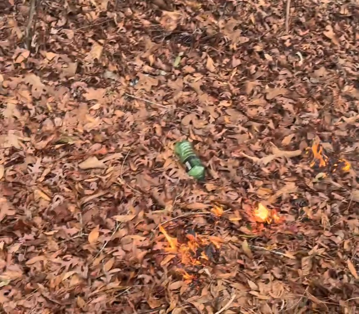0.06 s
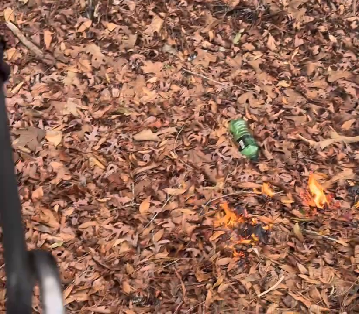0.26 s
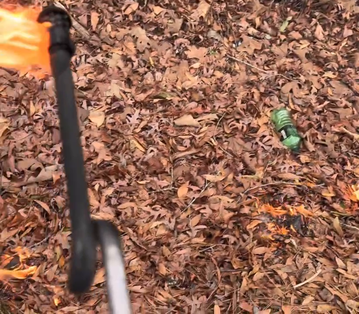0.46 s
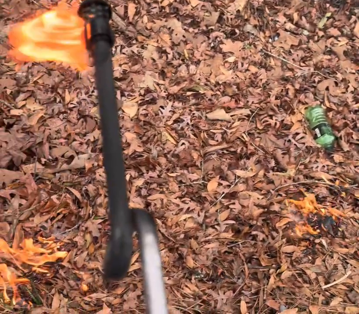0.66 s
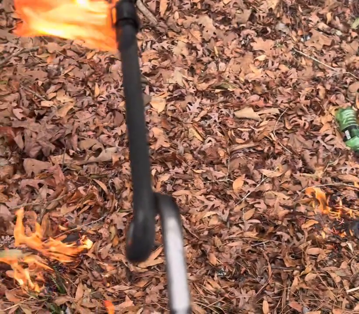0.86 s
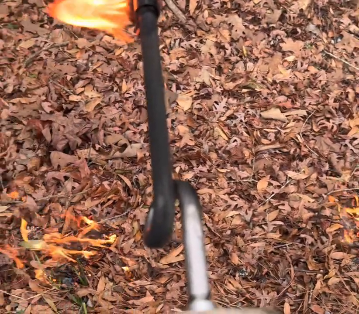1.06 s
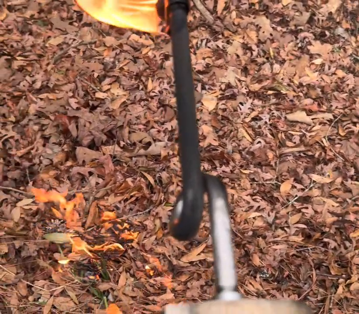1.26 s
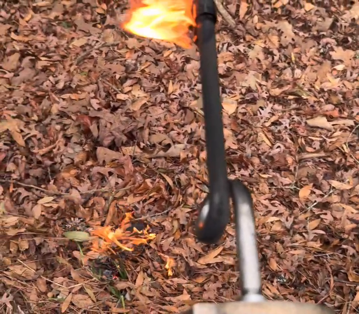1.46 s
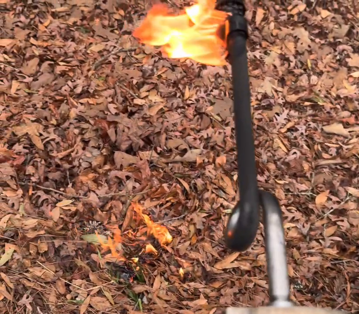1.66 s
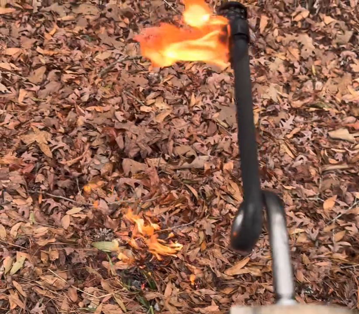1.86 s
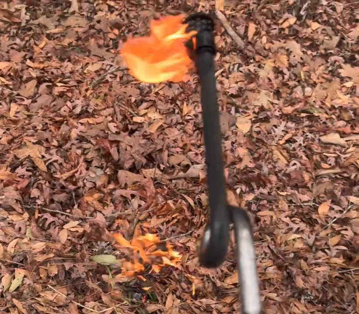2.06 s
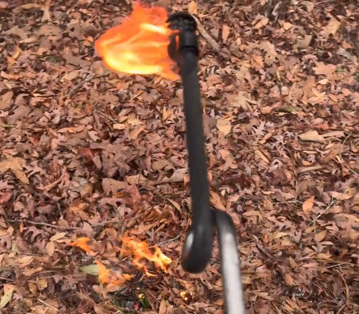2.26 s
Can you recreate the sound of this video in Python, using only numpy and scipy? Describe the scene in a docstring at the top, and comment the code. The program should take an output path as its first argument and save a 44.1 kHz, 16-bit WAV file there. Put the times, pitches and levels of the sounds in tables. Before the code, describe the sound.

Small fires crackle through dry leaves, over the soft flapping of a close torch flame.

```python
"""On a forest floor, small fires creep through dry leaves. Brittle fracture gives sharp snaps and a fine
crackle; the burning edge sizzles and steam escapes in short spits. A torch flame close to the microphone
flutters in the breeze with a low, turbulent rumble, flapping now and then. The leaf litter scatters each
snap briefly and stirs with a soft rustle and a few scuffs; the woods add a faint tail and a steady hush."""
import sys
import numpy as np
from scipy import signal
from scipy.fft import rfft, irfft, next_fast_len
from scipy.io import wavfile
from scipy.ndimage import map_coordinates

SR = 44100
rng = np.random.default_rng(int(sys.argv[2]) if len(sys.argv) > 2 else 0)


def to_wav(s):
    """Save 16-bit WAV."""
    ch = np.atleast_2d(s).T  # columns
    pcm = np.round(np.clip(ch, -1, 1) * 32767)  # PCM
    wavfile.write(sys.argv[1], SR, pcm.astype(np.int16))


N = 105840

# Spectra of the noise sources. Each row: frequency in Hz, relative level in dB.
HUSH_SPECTRUM = [(20, 3.5), (60, 10.5), (130, 8.5), (300, 8), (500, -0.5), (750, -21), (1100, -33),
                 (2000, -37), (5000, -37), (16000, -25)]
RUSTLE_SPECTRUM = [(200, 8), (500, 7.5), (900, 2), (1400, -9), (2200, -8.5), (5000, -6.5), (16000, -99)]
SCUFF_SPECTRUM = [(150, -15), (500, 9), (850, 0.5), (1250, 2.5), (1700, -13), (4000, -21), (16000, -45)]
RUMBLE_SPECTRUM = [(20, -18), (30, -21), (42, 2), (76, -3), (105, 5), (135, 0), (200, -13), (400, -48),
                   (800, -70)]
ROAR_SPECTRUM = [(70, -1.5), (130, 4), (180, 7), (250, -1), (340, 5), (460, -30), (600, -36), (1000, -45),
                 (3000, -70)]
SIZZLE_SPECTRUM = [(300, -65), (1200, -4.5), (2400, -5), (3700, -5.5), (4600, -12.5), (5700, -2),
                   (8300, 1.5), (10400, -6), (12400, -14), (15400, 10.5), (16300, -35)]
TAIL_SPECTRUM = [(300, 20), (1500, -3), (4000, 8.5), (7000, 7.5), (10500, 3.5), (15000, -36)]
# Colour of the burning leaves, and of the fine crackle alone. Each row: frequency in Hz, gain in dB.
LEAF_COLOUR = [(400, -14), (1400, -0.5), (2200, -2.5), (3000, -4), (3800, 2), (4600, -1.5), (5600, 4),
               (7000, 0.5), (8600, 4), (10000, -1.5), (11200, 1), (12400, 5.5), (15300, 7), (16400, -8)]
CRACKLE_COLOUR = [(200, -25), (1200, -5), (4000, -2), (8000, -1), (15000, 1)]
# Slow envelopes of rustle, sizzle and the torch between puffs. Each row: time in seconds, level in dB.
RUSTLE_LEVEL = [(0, -61.5), (.2, -69.5), (1.4, -65), (1.68, -61.5), (1.82, -61), (1.92, -63.5),
                (2.0, -60.5), (2.07, -68.5), (2.4, -61)]
SIZZLE_LEVEL = [(0, -57), (.2, -65.5), (.45, -60.5), (.6, -61), (.78, -63), (1.15, -63), (1.5, -65),
                (1.8, -60.5), (2.05, -61.5), (2.25, -60.5), (2.4, -60)]
TORCH_LEVEL = [(0, -66.5), (.18, -54), (.3, -45), (.75, -53), (1.7, -49.5), (1.83, -55), (2.05, -66.5),
               (2.4, -62.5)]
# Scuffs in the litter. Each row: centre in seconds, level in dB, left minus right in dB.
SCUFFS = [(1.677, -60, -5), (1.764, -60, -5), (1.968, -60, -2)]
# Throb of the torch flame. Each row: time in seconds, central rate in Hz.
FLUTTER_RATE = [(0.199, 62.46), (.3, 79.92), (.7, 70.05), (1.1, 84.82), (1.802, 60.2)]
# Puffs of the flame. Each row: centre in seconds, relative level in dB.
PUFFS = [(0.053, -52), (0.229, -38), (0.263, -34), (0.288, -43), (0.324, -58), (0.391, -24), (0.425, -28),
         (0.472, -28.5), (0.504, -25), (0.549, -39.5), (0.578, -36), (0.606, -32), (0.648, -41.5),
         (0.719, -47), (0.755, -51.5), (0.854, -37), (0.885, -36.5), (0.934, -43), (0.995, -32.5),
         (1.053, -42.5), (1.103, -40), (1.164, -39), (1.211, -40.5), (1.288, -50), (1.379, -44),
         (1.427, -40), (1.463, -42.5), (1.512, -42), (1.55, -49), (1.597, -35.5), (1.67, -41),
         (1.728, -37.5), (1.778, -43), (1.87, -69), (2.142, -48)]
# Flaps of the flame. Each row: start in seconds, level at full swell in dB.
FLAPS = [(0.373, -46), (0.491, -38.5), (0.786, -46.5), (0.835, -43), (0.873, -44), (0.936, -45),
         (0.948, -41), (0.972, -41.5), (0.991, -39), (1.012, -41.5), (1.146, -41.5), (1.215, -42.5),
         (1.37, -44.5), (1.392, -40.5), (1.407, -42), (1.418, -42), (1.588, -36), (1.658, -45.5),
         (1.957, -51)]
# Spits of steam. Each row: start in seconds, level before colouring in dB, decay time in seconds.
SPITS = [(0.174, -52, 0.043), (.486, -46, 0.012), (.616, -46.5, 0.011), (1.056, -48.5, 0.016)]
# Leaf snaps. Each row: start in seconds, low, middle and top band levels before colouring in dB,
# ring frequency in Hz.
SNAPS = [(0.035, -46, -52, -51, 1780), (0.0768, -59, -51.5, -47, 7500), (0.0972, -49.5, -49, -52, 5800),
         (0.1729, -61, -44, -38.5, 7200), (0.1793, -75, -59, -39.5, 8100), (0.2312, -73, -57, -47, 8400),
         (0.2362, -62, -50.5, -44.5, 7760), (0.2474, -82, -53.5, -49, 7600),
         (0.3575, -71, -49.5, -38, 7500), (0.3884, -57, -50.5, -42.5, 2870),
         (0.4145, -56, -48.5, -42, 7800), (0.4378, -57, -49, -46, 6400), (0.4572, -58, -51, -48, 3000),
         (0.4818, -51, -46, -33, 3630), (0.483, -43.5, -34, -36, 7000), (0.5237, -40, -36, -37, 3270),
         (0.5252, -63, -46, -37, 7300), (0.5366, -66, -50, -54, 6240), (0.545, -70, -62, -49, 8340),
         (0.612, -54, -47.5, -43.5, 7600), (0.619, -55, -47.5, -43, 7200), (0.6203, -54, -46.5, -48, 6070),
         (0.6354, -61, -44.5, -38, 7300), (0.644, -74, -62, -48, 8600), (0.815, -48, -42, -45, 5570),
         (0.8234, -59, -46.5, -45, 5500), (0.9, -68, -66, -49, 9320), (0.9643, -73, -52, -50.5, 6900),
         (1.0378, -82, -43.5, -35.5, 6340), (1.053, -37.5, -35, -42, 7263), (1.0554, -39, -28, -31, 8200),
         (1.1114, -69, -44, -45, 8500), (1.1774, -58.5, -47, -40, 6400), (1.268, -82, -41.5, -36, 6600),
         (1.3183, -36.5, -32.5, -31.5, 3500), (1.4546, -65, -46, -47, 7800),
         (1.6033, -58, -48, -49.5, 8237), (1.6254, -45.5, -46, -45.5, 7794), (1.6612, -66, -54, -47, 7880),
         (1.6658, -61, -48.5, -45, 6500), (1.7413, -47.5, -39, -39, 5780), (1.788, -60.0, -48.5, -44, 9000),
         (1.792, -50, -51, -45.5, 8900), (1.8367, -53.5, -59, -65, 1260), (1.858, -52.5, -45, -51, 7020),
         (1.887, -53, -34, -32.5, 9800), (1.932, -54, -44.5, -42, 6400), (2.0997, -52.5, -42.5, -47, 3450),
         (2.1574, -75, -60, -45, 7900), (2.2103, -36.5, -40, -36, 3990), (2.235, -49.5, -45.5, -33.5, 6550),
         (2.2605, -55, -41.5, -38, 7900), (2.278, -51, -47, -35.5, 9300), (2.287, -51.5, -43, -41, 6700),
         (2.3432, -55, -51, -43.5, 7760), (2.395, -58.0, -44.5, -51, 5700)]
# The low, middle and top bands of a snap. Each row: lower edge in Hz, upper edge in Hz.
SNAP_BANDS = [(400, 2500), (2500, 9500), (9500, 16800)]
# Phase between the two microphone ports. Each row: frequency in Hz, lead of the left in radians.
PORT_PHASE = [(0, 0), (1900, 0), (3000, -.6), (4100, -.7), (4850, -1.9), (5600, -.3), (6400, -.3),
              (9000, -1.6), (10500, -2.7), (13000, -3.2), (15600, -4.5)]

LOW_CUT_HZ, TOP_HZ = 14.3, 16500  # limits of the microphone's passband
TIME = np.arange(N) / SR


def amp(db):
    """Amplitude ratio of a level in decibels."""
    return 10 ** (np.asarray(db) / 20)


def unit(x):
    """Normalisation to an rms of 1."""
    return x / np.sqrt(np.mean(x ** 2) + 1e-20)


def sized(x, db):
    """Energy normalisation: x carries the energy of one millisecond at this level."""
    return amp(db) * x * np.sqrt(SR / 1000 / np.sum(x ** 2))


def add(track, start, x):
    """Superposition of x on the track from a start in seconds."""
    i = max(round(start * SR), 0)
    span = track[i:i + len(x)]
    span += x[:len(span)]


def envelope(rows):
    """A gain per sample, interpolated in decibels."""
    return amp(np.interp(TIME, *np.transpose(rows)))


def swells(rows, half_width_s):
    """Incoherent addition: bell-shaped swells sum in power."""
    return np.sqrt(sum(amp(db) ** 2 * np.exp(-((TIME - s) / half_width_s) ** 2) for s, db in rows))


def wobble(knots_per_s, order=3):
    """Random modulation: a spline through Gaussian values."""
    return map_coordinates(rng.standard_normal(N), [TIME * knots_per_s], order=order)


def filtered(x, response):
    """Linear filtering: the spectrum of x is multiplied by a complex frequency response."""
    size = next_fast_len(N + 8192)
    hz = np.fft.rfftfreq(size, 1 / SR)
    return irfft(rfft(x, size) * response(hz), size)[..., :N]


def coloured(x, points):
    """Spectral shaping by gains in dB, interpolated on a logarithmic frequency axis."""
    point_hz, db = np.transpose(points)
    return filtered(x, lambda hz: amp(np.interp(np.log(hz + 1), np.log(point_hz + 1), db)))


def ports(x):
    """One wave reaches the two microphone ports with a phase difference that depends on frequency."""
    sides = np.array([[1], [-1]])
    return filtered(x, lambda hz: np.exp(.5j * np.interp(hz, *np.transpose(PORT_PHASE)) * sides))


def rush(spectrum, diffuse_db):
    """Partly coherent stereo noise of rms 1: a direct wave plus a diffuse part unlike at each port."""
    direct = ports(rng.standard_normal(N))
    diffuse = amp(diffuse_db) * rng.standard_normal((2, N))
    return unit(coloured(direct + diffuse, spectrum))


def woods():
    """Ambient noise: a steady hush and the diffuse rustle of the leaf litter."""
    hush = amp(-60.5) * rush(HUSH_SPECTRUM, diffuse_db=-.5)
    rustle = envelope(RUSTLE_LEVEL) * rush(RUSTLE_SPECTRUM, diffuse_db=15)
    return hush + rustle


def scuffs():
    """Shifting leaves give dull swishes, placed to the right by a level difference."""
    out = np.zeros((2, N))
    for centre, db, pan_db in SCUFFS:
        swell = swells([(centre, db)], half_width_s=.0083)
        balance = amp([[pan_db / 2], [-pan_db / 2]])
        out += swell * balance * rush(SCUFF_SPECTRUM, diffuse_db=-20)
    return out


def flaps(start_hz=592.6, end_hz=73.5, rise_s=.0091, glide_s=.0055):
    """The flame tears and closes again: a quick downward chirp with a little turbulent roar."""
    t = np.arange(SR // 20) / SR
    hz = end_hz + (start_hz - end_hz) * np.exp(-t / glide_s)
    phase = 2 * np.pi * np.cumsum(hz) / SR
    shape = (t / rise_s * np.exp(1 - t / rise_s)) ** 2
    chirps, swell = np.zeros(N), np.zeros(N)
    for start, db in FLAPS:
        chirp = np.sqrt(2) * np.sin(phase + rng.uniform(0, 2 * np.pi))
        add(chirps, start, amp(db) * shape * chirp)
        add(swell, start, amp(db) * shape)
    roar = amp(-10.5) * swell * rush(ROAR_SPECTRUM, diffuse_db=2)
    return chirps + roar


def torch():
    """A flame oscillates at a wandering rate amid turbulence; puffs modulate both, and flaps add on top."""
    puffs = amp(-1.5) * swells(PUFFS, half_width_s=.013)
    strength = np.hypot(puffs, envelope(TORCH_LEVEL))
    wander = np.exp(.17 * wobble(knots_per_s=80))
    hz = np.interp(TIME, *np.transpose(FLUTTER_RATE)) * wander
    throb = unit(np.sin(2 * np.pi * np.cumsum(hz) / SR))
    turbulence = amp(-6) * rush(RUMBLE_SPECTRUM, diffuse_db=-9.5)
    return strength * (throb + turbulence) + flaps()


def woods_tail(x, gain_db=-17, decay_s=.016):
    """Reverberation: scattered sound follows the power of x and dies away exponentially."""
    retained = np.exp(-2 / (decay_s * SR))
    power = signal.lfilter([1 - retained], [1, -retained], x ** 2)
    return amp(gain_db) * np.sqrt(power) * rush(TAIL_SPECTRUM, diffuse_db=-1.5)


def sizzle(grain_db=5):
    """The burning edge hisses; random amplitude modulation gives the noise its fine, uneven grain."""
    grain = amp(grain_db * wobble(knots_per_s=450, order=1))
    return envelope(SIZZLE_LEVEL) * unit(grain * rush(SIZZLE_SPECTRUM, diffuse_db=-7))


def spits():
    """Escaping steam radiates a short hiss that decays exponentially."""
    out, t = np.zeros(N), np.arange(SR // 10) / SR
    for start, db, decay_s in SPITS:
        add(out, start, amp(db) * rng.standard_normal(len(t)) * np.exp(-t / decay_s))
    return coloured(out, [(500, 13.5), (3000, -43), (6500, 2), (15000, -1)])


def fracture(t, ring_hz, rise_s=.00009, ring_s=.00026, litter_s=.0012):
    """Impulse excitation: a crack sets the leaf into damped vibration, and the litter scatters it."""
    crack = rng.standard_normal(len(t)) * t * np.exp(-t / rise_s)
    ring = np.sin(2 * np.pi * ring_hz * t) * np.exp(-t / ring_s) * (1 - np.exp(-t / rise_s))
    litter = rng.standard_normal(len(t)) * np.exp(-t / litter_s)
    return unit(unit(crack) + amp(-7) * unit(ring) + amp(-9) * unit(litter))


def crackle(count=800, ticks_per_s=220):
    """A Poisson process of tiny fractures, most of them faint."""
    out, t = np.zeros(N), np.arange(96) / SR
    starts = np.cumsum(rng.exponential(size=count)) / ticks_per_s
    levels_db = np.minimum(-68 + 3.8 * rng.exponential(size=count), -54)
    rings_hz = np.minimum(6500 * np.exp(.5 * rng.standard_normal(count)), TOP_HZ)
    for start, db, ring_hz in zip(starts, levels_db, rings_hz):
        add(out, start, sized(fracture(t, ring_hz), db))
    return coloured(out, CRACKLE_COLOUR)


def snaps(knock_hz=740, knock_db=-5.5):
    """Brittle fracture: each leaf spreads its energy over three bands, with a dull, damped knock."""
    out, t = np.zeros(N), np.arange(256) / SR
    bands = [signal.butter(3, edges, 'bandpass', fs=SR, output='sos') for edges in SNAP_BANDS]
    knock = np.sin(2 * np.pi * knock_hz * t) * np.exp(-2 * knock_hz * t)
    for start, *levels_db, ring_hz in SNAPS:
        add(out, start, sized(knock, levels_db[0] + knock_db))  # relative to the low band
        burst = fracture(t, ring_hz)
        for band, db in zip(bands, levels_db):
            add(out, start, sized(signal.sosfilt(band, burst), db))
    return out


def litter_bounce():
    """Diffuse reflection: the litter returns the snaps with a different waveform and delay at each port."""
    bounce = amp(-9) * coloured(np.array([snaps(), snaps()]), LEAF_COLOUR)
    delays_s = np.array([[.0003], [.00042]])
    return filtered(bounce, lambda hz: np.exp(-2j * np.pi * hz * delays_s))


def burning_leaves():
    """The direct sound of snaps, crackle and steam adds to reflection and reverberation, over a sizzle."""
    direct = coloured(snaps() + crackle() + spits(), LEAF_COLOUR)
    return ports(direct) + litter_bounce() + woods_tail(direct) + sizzle()


def scene():
    """Independent sources add by superposition."""
    return burning_leaves() + torch() + scuffs() + woods()


def record(dry):
    """The microphone acts as a band-pass filter: the deepest bass rolls off and the top ends steeply."""
    thinned = filtered(dry, lambda hz: hz ** 3 / np.sqrt(hz ** 6 + LOW_CUT_HZ ** 6))
    return filtered(thinned, lambda hz: 1 / np.sqrt(1 + (hz / TOP_HZ) ** 200))


dry = scene()
out = record(dry)
to_wav(out)
```